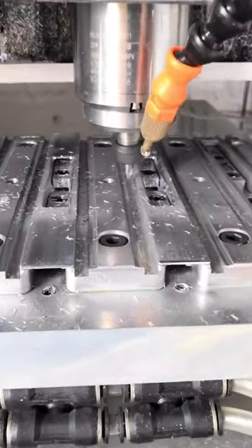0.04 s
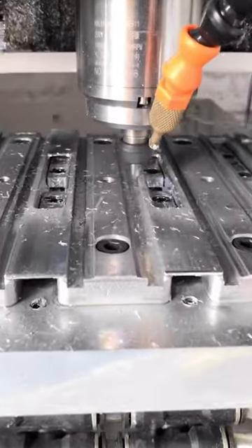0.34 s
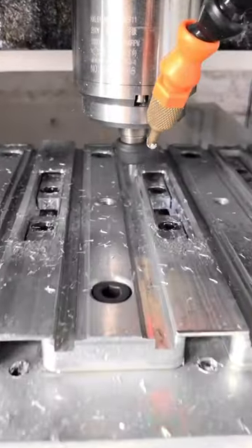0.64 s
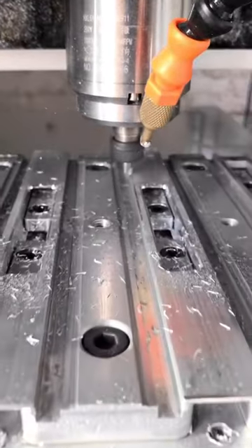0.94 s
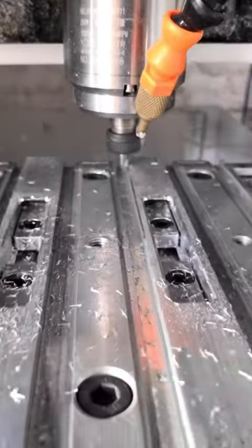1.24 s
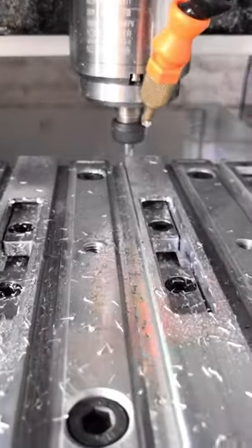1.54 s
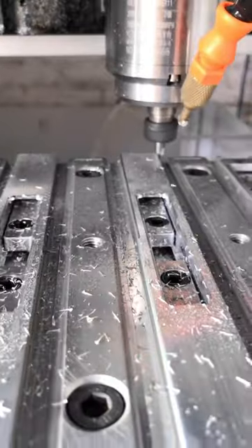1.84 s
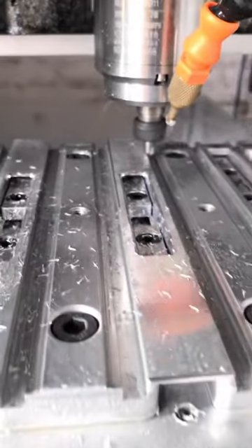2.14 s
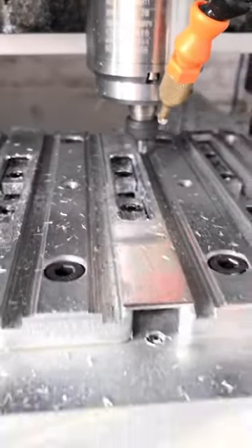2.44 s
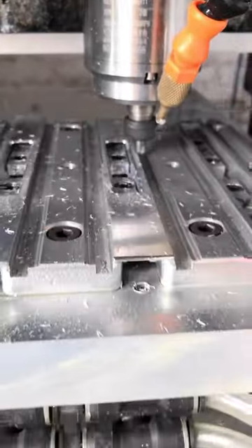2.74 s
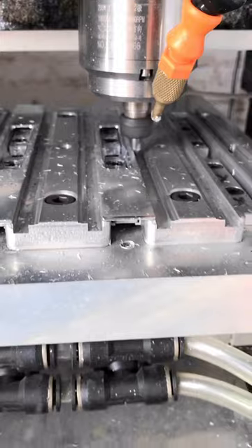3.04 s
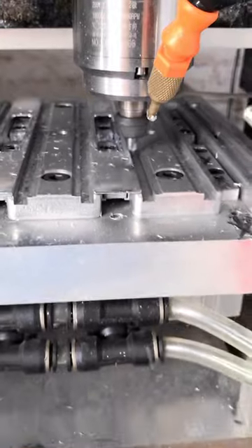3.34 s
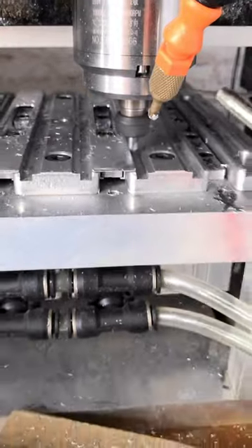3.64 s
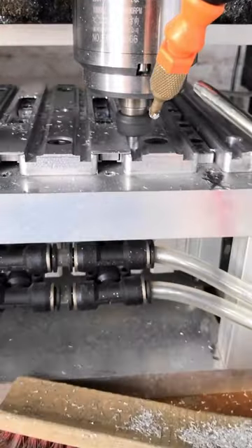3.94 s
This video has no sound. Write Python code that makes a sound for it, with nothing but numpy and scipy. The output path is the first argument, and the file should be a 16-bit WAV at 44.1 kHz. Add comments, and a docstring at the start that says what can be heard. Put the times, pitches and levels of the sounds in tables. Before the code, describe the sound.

Shrill whine of a small milling cutter biting metal, with a hissing air nozzle close by.

```python
"""A small milling spindle at 45,000 rpm cuts aluminium close to the microphone: a whine on the harmonics
of its turning rate, with thin squeals where the cutter bites and a faint throbbing tone beside it.
A second, slower spindle sags under load and fades out halfway. An air nozzle hisses at the cutter.
Behind it all lies the room tone of the workshop, motor hum and low rumble, heard on one microphone."""
import sys
import numpy as np
from scipy import signal
from scipy.fft import rfft, irfft
from scipy.io import wavfile
from scipy.ndimage import uniform_filter1d

SR = 44100
rng = np.random.default_rng(int(sys.argv[2]) if len(sys.argv) > 2 else 0)


def persist_wave(psi):
    """Save psi, clipped to +-1, as 16-bit WAV."""
    counts = np.round(np.clip(psi, -1, 1) * 32767).astype(np.int16)
    wavfile.write(sys.argv[1], SR, np.atleast_2d(counts).T)


N = 176400

# The near cutter is in the metal. Each row: start and end in seconds.
CUTS = [(.305, 1.387), (1.843, 4.2)]
# Near spindle. Each row: harmonic number, free-running level in dB, level of the cut's share in dB.
NEAR_HARMONICS = [(1, -40, -53), (5, -58.5, -50), (7, -58.5, -50), (8, -56, -50), (9, -60, -56),
                  (11, -61, -56), (12, -61, -54.5), (13, -64, -65), (15, -56, -54), (16, -52, -55),
                  (17, -60, -56), (18, -58, -50), (20, -56, -56)]
# Its low overtones. Each row: time in seconds, levels of harmonics 2, 3 and 6 in dB before their lift.
OVERTONE_LEVELS = [(0.0, -46, -49, -55), (0.08, -43, -54, -57), (0.4, -45, -44, -40.5),
                   (0.61, -43.5, -41.5, -47), (1.02, -41.5, -43.5, -41.5), (1.37, -38, -39, -48),
                   (1.43, -43, -51, -45), (1.77, -39.5, -55, -58), (1.84, -45, -40, -47),
                   (1.9, -33.5, -37.5, -40), (2.77, -54.5, -40.5, -44), (3.63, -47, -55, -49.5),
                   (3.92, -45, -44, -29), (4.0, -38.5, -52, -24)]
# Its main whine in the first and second cut. Each row: time in seconds, level in dB before its lift.
FIRST_CUT_WHINE = [(0.36, -35), (0.492, -32.5), (1.008, -35), (1.35, -32)]
SECOND_CUT_WHINE = [(1.87, -25.5), (1.91, -25), (1.95, -27), (2.46, -27.5), (2.94, -31), (3.13, -30),
                    (3.79, -35.5), (3.95, -22), (4.0, -21.5)]
# Resonances of tool and work, at the near and at the slow spindle.
# Each row: peak time, rise and fall in seconds, centre and half-width in Hz, level in dB.
NEAR_SQUEALS = [(1.22, .08, .12, 12200, 600, -34), (1.27, .09, .1, 9780, 350, -37),
                (1.29, .07, .07, 15040, 450, -34), (1.86, .035, .06, 9700, 550, -26),
                (1.855, .035, .07, 12150, 650, -25.5), (2.03, .11, .1, 9000, 450, -29),
                (1.97, .08, .11, 8100, 550, -34), (2.01, .08, .06, 13540, 450, -29.5),
                (2.02, .07, .08, 14900, 550, -36), (2.12, .12, .1, 12750, 450, -31),
                (2.13, .15, .22, 11900, 520, -30), (2.08, .15, .15, 6000, 1300, -41),
                (3.75, .06, .06, 8280, 400, -35), (3.8, .08, .08, 13540, 500, -32),
                (3.9, .22, .2, 12100, 900, -33), (3.86, .09, .07, 9000, 400, -36),
                (3.995, .05, .1, 7520, 450, -28), (3.98, .04, .1, 13540, 350, -31),
                (3.98, .08, .1, 15040, 450, -31), (3.9, .12, .15, 3760, 300, -39),
                (3.79, .05, .1, 4514, 300, -33)]
SLOW_SQUEALS = [(1.222, 0.072, 0.065, 3970, 259.3, -31), (1.26, .05, .08, 6450, 350, -35),
                (1.368, 0.09, 0.23, 5930, 277.8, -37), (1.332, .17, 0.59, 7260, 1060, -44),
                (1.618, 0.2, 0.12, 905, 354, -34), (1.66, 0.47, 0.26, 2970, 240, -32)]
# The cutter catches the edge, skips and bites again. Each row: time in seconds, strength in dB.
STRIKES = [(1.793, 0), (1.826, -14)]
# What those strikes ring. Each row: centre and half-width in Hz, level in dB at full strength.
STRIKE_MODES = [(9600, 900, -21.5), (12300, 810, -25), (14600, 890, -30)]
# The throbbing tone. Each row: time in seconds, level in dB.
SIDE_TONE_LEVEL = [(0.0, -57), (0.27, -57), (0.4, -39), (1.84, -48.5), (1.96, -51), (2.99, -41.5),
                   (3.97, -49), (4.0, -56)]
# Speed of the slow spindle. Each row: time in seconds, turning rate in Hz.
SLOW_RATE = [(0, 502), (.15, 499.5), (.55, 499.2), (.8, 500.4), (1.07, 500.5), (1.25, 496.2), (1.45, 494.3),
             (1.6, 494.2), (1.72, 495.7), (1.85, 496), (1.97, 498.5), (2.4, 497)]
# Loudness of its whine. Each row: time in seconds, level in dB before lift and fade.
SLOW_LEVEL = [(0.0, -36), (0.06, -30), (0.28, -29.5), (0.81, -33.5), (0.85, -41), (0.93, -31), (0.96, -33),
              (0.99, -42.5), (1.19, -27), (1.42, -32), (1.88, -28), (1.97, -47), (1.99, -36), (2.06, -43),
              (2.1, -59), (2.12, -46)]
# Make-up of that whine. Each row: harmonic number, relative level in dB.
SLOW_HARMONICS = [(1, -30), (2, -12), (3, -21.5), (4, 1.5), (5, -22.5), (6, -14), (7, -17), (8, -20.5),
                  (9, -24), (12, -19)]
# Colour of the nozzle's hiss. Each row: frequency in Hz, relative level in dB.
AIR_SPECTRUM = [(200, -13), (500, -3.5), (900, -1.5), (1300, -3.5), (2600, -5), (3300, -3.5), (4200, 0.5),
                (4900, -2.5), (5900, 0.5), (7200, 0.5), (9300, -1.5), (10400, -5.5), (11400, -0.5),
                (12400, 0), (14000, -1.5), (15800, -3.5)]
# Drift of the hiss. Each row: time in seconds, gains of the low, middle and high band in dB.
AIR_BAND_GAINS = [(0, 0.5, 0.5, 0.5), (.4, 0, 0, 1.5), (.65, -0.5, -0.5, 0), (1.05, 1.5, -2, 1.5),
                  (1.35, 0.5, 1.5, 4.5), (1.6, 2, 2, 1), (2.0, -1.5, -1.5, -.5), (2.2, -2, -1.5, -1),
                  (2.45, 0, 4.5, -1.5), (2.8, 0, 5.5, -1), (3.4, 0.5, 2, 1), (3.75, -1, 2.5, 1),
                  (4, 0, 1, 1)]
# The jet whistles over slots and edges.
# Each row: peak time and half-length in seconds, centre and half-width in Hz, level in dB.
WHISTLES = [(.1, 0.038, 970, 60, -36), (0.107, 0.08, 1570, 300, -38), (.46, 0.17, 5700, 300, -36),
            (0.897, 0.56, 14000, 1300, -35), (1.25, 0.44, 6100, 600, -37), (2.85, 0.15, 5600, 450, -37),
            (3.2, 0.073, 5960, 400, -36), (3.802, 0.28, 6500, 500, -39.5), (3.6, 0.94, 940, 35, -45.5)]
# Colour of the room's rumble. Each row: frequency in Hz, relative level in dB.
RUMBLE_SPECTRUM = [(20, -38), (35, -25), (60, -7), (90, -2.5), (140, 1), (190, -0.5), (250, -1),
                   (330, -2.5), (380, -5.5), (430, -13.5), (600, -16.5), (1200, -25)]
# Motors around the workshop. Each row: frequency in Hz, level in dB, waver in dB.
MOTOR_HUMS = [(48.8, -48.5, 3), (106, -48, -2), (129.5, -37.5, 2.5), (250, -46.5, 2), (498.7, -54.5, 1)]
# Brief swells of hum. Each row: peak time and half-length in seconds, frequency in Hz, level in dB.
HUM_SWELLS = [(.42, 0.26, 102, -35.5), (1.503, 0.29, 108, -41), (1.788, 0.23, 244.4, -42.5),
              (3.353, 0.23, 252, -38.5)]


def near_spindle(rate_hz=752.35, entry_s=.045, whine_lift_db=3.5):
    """Close up, the harmonics of a steady shaft: most grow in the cut, and resonances make them squeal."""
    t = np.arange(N) / SR
    angle = turning(rate_hz * (1 + .0002 * walk(14)))
    cutting = sum(np.clip(np.minimum(t - start, end - t) / entry_s + .5, 0, 1) for start, end in CUTS)
    blows = sum(undb(db) * strike(at) for at, db in STRIKES)
    squeals = [(swell(*row[:3]), *row[3:]) for row in NEAR_SQUEALS]
    struck_modes = [(blows, *mode) for mode in STRIKE_MODES]
    levels = resonate(rate_hz, squeals + struck_modes, count=20)
    for k, free_db, cut_db in NEAR_HARMONICS:
        levels[k] = np.hypot(levels[k], undb(free_db) + cutting * undb(cut_db))
    for column, (k, lift_db) in enumerate([(2, 2), (3, 0), (6, 2.5)], start=1):
        levels[k] = np.hypot(levels[k], undb(curve(OVERTONE_LEVELS, column) + lift_db))
    harmonics = 0
    for k, level in levels.items():
        flutter_db = 1.0 if k <= 6 else 1.3
        harmonics += level * undb(flutter_db * walk(21.83)) * tone(k * angle)
    whine_db = curve(FIRST_CUT_WHINE + SECOND_CUT_WHINE) + whine_lift_db + .26 * walk(27)
    return harmonics + cutting * undb(whine_db) * tone(4 * angle)  # main whine: four times a turn


def strike(at, rise_s=.0061, decay_s=.015):
    """Envelope of the cutter catching the edge: a quick rise and an exponential fall."""
    t = np.arange(N) / SR - at
    return np.exp(-np.minimum(np.where(t < 0, (t / rise_s) ** 2, t / decay_s), 50))


def resonate(rate_hz, resonances, count):
    """Level of each shaft harmonic as resonances of tool and work lift those near them."""
    levels = {k: np.zeros(N) for k in range(1, count + 1)}
    for envelope, hz, width, db in resonances:
        for k in levels:
            offset_hz = k * rate_hz - hz
            if abs(offset_hz) < 2 * np.pi * width:
                levels[k] += envelope * undb(db) / (1 + (offset_hz / width) ** 4)
    return levels


def side_tone(hz=1865, throb_hz=18.5):
    """A faint tone off the harmonic series, throbbing quickly in level and pitch."""
    throb = np.sin(turning(np.full(N, throb_hz)))
    level = undb(curve(SIDE_TONE_LEVEL) + 2.3 * throb)
    return level * tone(turning(hz + .72 * walk(10)) + throb)


def slow_spindle(lift_db=1, fade_from_s=2.13, fade_db_per_s=32.5):
    """A lower whine that sags and squeals as the shaft takes load, then dies away after its cut."""
    rate_hz = curve(SLOW_RATE)
    angle = turning(rate_hz * (1 + .00024 * walk(23.6)))
    squeals = [(swell(*row[:3]), *row[3:]) for row in SLOW_SQUEALS]
    levels = resonate(np.mean(rate_hz), squeals, count=18)
    fade_db = fade_db_per_s * np.maximum(np.arange(N) / SR - fade_from_s, 0)
    effort = undb(curve(SLOW_LEVEL) + lift_db - fade_db)
    squeal_only = [k for k in levels if k not in dict(SLOW_HARMONICS)]
    whine = sum(levels[k] * undb(1.3 * walk(26.2)) * tone(k * angle) for k in squeal_only)
    for k, db in SLOW_HARMONICS:
        flutter_db = .5 if db > -6 else 1.8  # the strongest harmonic is the steadiest
        level = np.hypot(levels[k], effort * undb(db))
        whine += level * undb(flutter_db * walk(18.48)) * tone(k * angle)
    return whine


def air_jet(base_db=-30, flicker_db=1.14, bands_hz=(7600, 8200, 10700)):
    """Hiss at the cutter that changes colour as the nozzle moves over the work, with breathy whistles."""
    hiss_spectrum = rfft(noise(colour(AIR_SPECTRUM)))
    freqs = np.arange(len(hiss_spectrum)) * SR / N
    air = 0
    for column, weights in enumerate(np.eye(len(bands_hz)), start=1):
        band = irfft(hiss_spectrum * np.interp(freqs, bands_hz, weights), N)  # neighbours crossfade
        air += band * undb(base_db + curve(AIR_BAND_GAINS, column) + flicker_db * walk(16))
    for peak, half_length, hz, width, db in WHISTLES:
        whistle = noise(lambda f: 1 / (1 + ((f - hz) / width) ** 2))
        air += undb(db) * swell(peak, half_length, half_length) * whistle
    return air


def workshop(rumble_db=-33.5):
    """Room tone behind the machines: wavering motor hums over a low rumble."""
    def hum(hz):
        return tone(turning(hz * (1 + .008 * walk(9))))

    motors = sum(undb(db + waver_db * walk(5)) * hum(hz) for hz, db, waver_db in MOTOR_HUMS)
    swells = sum(undb(db) * swell(peak, half, half) * hum(hz) for peak, half, hz, db in HUM_SWELLS)
    return motors + swells + undb(rumble_db) * noise(colour(RUMBLE_SPECTRUM))


def undb(db):
    """Decibels to gain."""
    return 10 ** (np.asarray(db) / 20)


def curve(table, column=1):
    """One column of a table, joined by straight lines in time."""
    rows = np.array(table)
    return np.interp(np.arange(N) / SR, rows[:, 0], rows[:, column])


def walk(rate_hz):
    """A smooth random drift with a spread near 1."""
    step = max(int(SR / rate_hz), 1)
    held = np.repeat(rng.standard_normal(N // step + 6), step)
    start = 2 * step + int(rng.uniform() * step)
    return 1.277 * uniform_filter1d(uniform_filter1d(held, step), step)[start:start + N]


def noise(gain):
    """Noise of rms 1 whose spectrum follows gain(Hz)."""
    freqs = np.arange(N // 2 + 1) * SR / N + 1e-9
    shaped = irfft(rfft(rng.standard_normal(N)) * gain(freqs), N)
    return shaped / np.std(shaped)


def colour(points):
    """Gain against frequency from (Hz, dB) points."""
    hz, db = np.array(points).T
    return lambda f: undb(np.interp(np.log(f), np.log(hz), db))


def swell(peak, rise, fall):
    """A rounded rise and fall, timed in seconds."""
    t = np.arange(N) / SR - peak
    return np.exp(-np.minimum((t / np.where(t < 0, rise, fall)) ** 2, 50))


def turning(hz):
    """Angle in radians from a turning rate."""
    return 2 * np.pi * np.cumsum(hz) / SR


def tone(angle):
    """A sine of rms 1 with a random starting phase."""
    return np.sqrt(2) * np.sin(angle + rng.uniform(0, 2 * np.pi))


def scene():
    """One microphone close to the cutter picks up everything, the same in both channels."""
    mono = near_spindle() + side_tone() + slow_spindle() + air_jet() + workshop()
    return np.array([mono, mono])


def record(dry):
    """The recorder cuts the treble steeply above 15.8 kHz."""
    return signal.sosfilt(signal.ellip(12, .1, 90, 15800, fs=SR, output="sos"), dry)


dry = scene()
out = record(dry)
persist_wave(out)
```